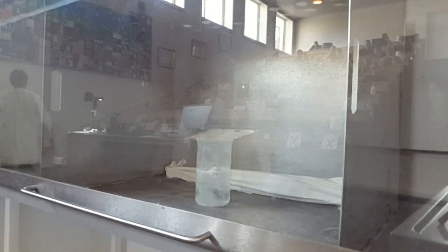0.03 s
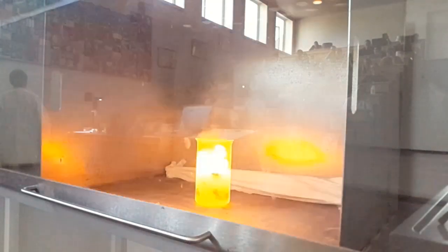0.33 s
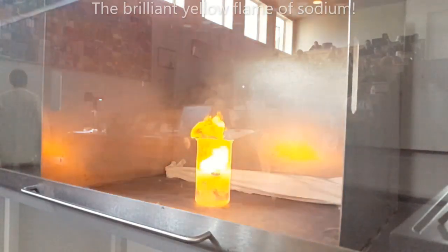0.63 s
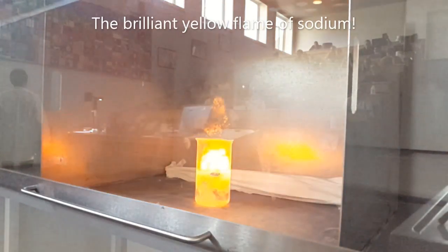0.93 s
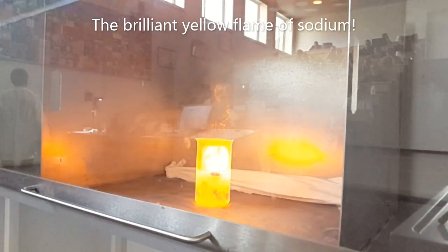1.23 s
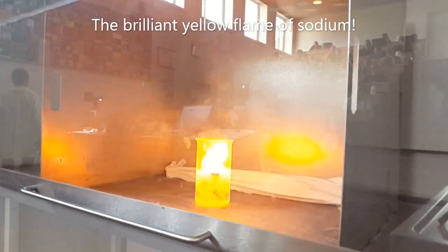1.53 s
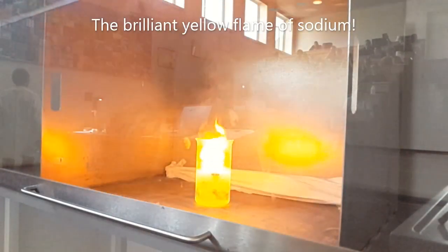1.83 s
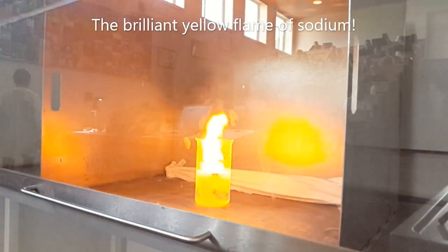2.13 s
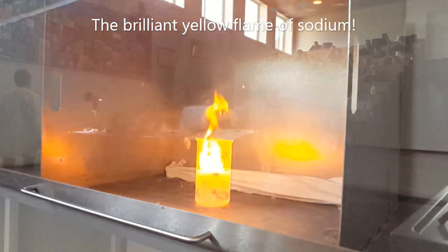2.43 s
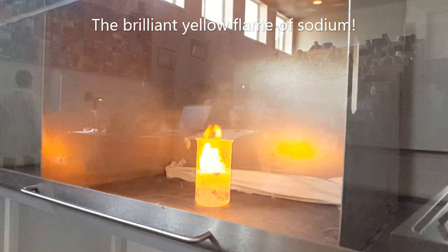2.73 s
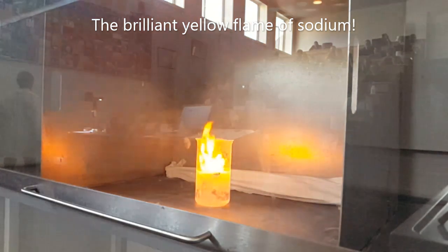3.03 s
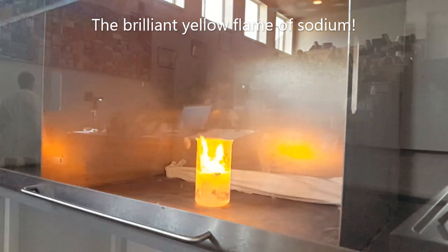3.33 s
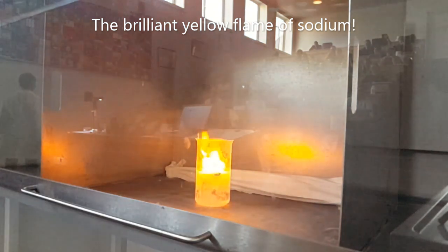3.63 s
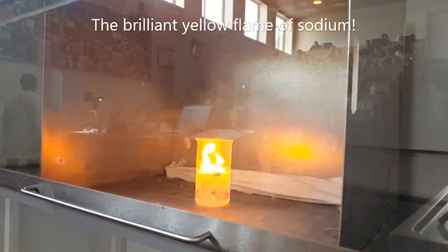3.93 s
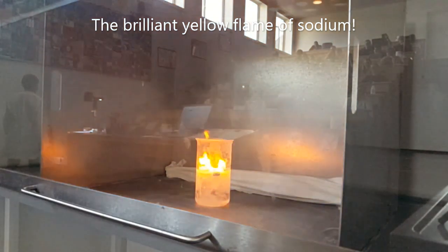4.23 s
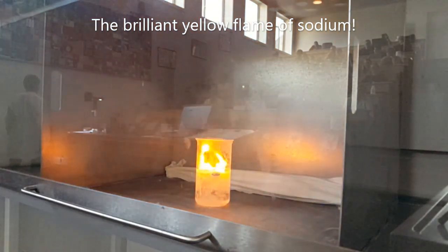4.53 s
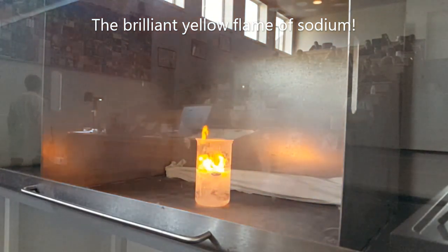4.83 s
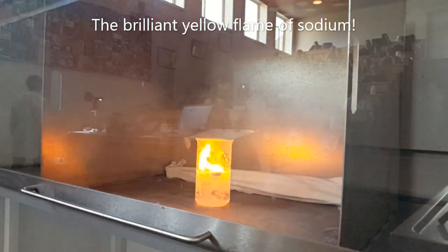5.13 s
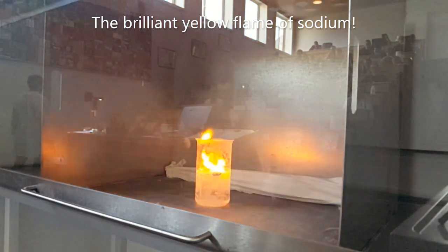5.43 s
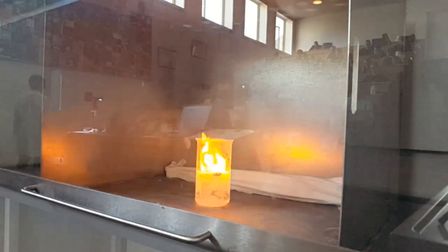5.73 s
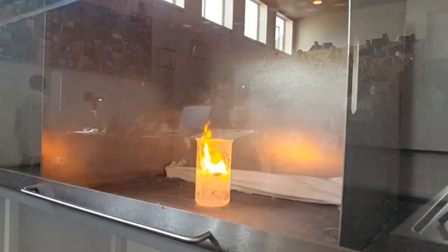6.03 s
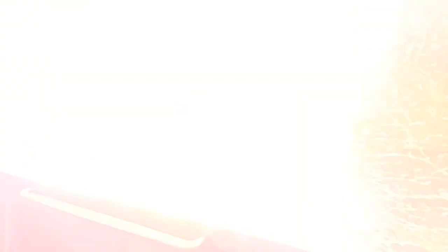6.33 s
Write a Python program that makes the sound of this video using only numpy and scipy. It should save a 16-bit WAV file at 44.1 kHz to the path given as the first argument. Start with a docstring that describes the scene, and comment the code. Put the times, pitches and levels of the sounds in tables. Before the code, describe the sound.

Over the faint rush of ventilation, a flame lights in a beaker with a soft whoomp. Its low, hollow rumble fades over a few seconds until only a slight flutter and fizz remain. Then the beaker explodes with an extremely loud, slightly distorted bang, and fragments crack left and right against the walls of the fume hood as the boom reverberates through the laboratory.

```python
"""Sodium burns on water in a beaker, then explodes, inside a humming fume hood with a faint whine.
Hydrogen fizzes off the metal and lights with a soft whoomp; the flame rumbles in the hood's cavity
and blows a faint note on the beaker's air column, which sharpens with the heat. The blast fills hood
and lab with a roar that drives a limiter, while molten droplets pop and shards crack on the walls."""
import sys
import numpy as np
from scipy.fft import rfft, irfft, next_fast_len
from scipy.io import wavfile
from scipy.ndimage import uniform_filter1d, minimum_filter1d, map_coordinates

SR = 44100
rng = np.random.default_rng(int(sys.argv[2]) if len(sys.argv) > 2 else 0)


def unload_audio(sound):
    """Save the sound as a 16-bit wav file, at the path given as the first command line argument."""
    columns = np.transpose(np.atleast_2d(sound))
    # keep every value between -1 and 1, then stretch to whole-number steps
    steps = np.round(np.clip(columns, -1, 1) * 32767)
    wavfile.write(sys.argv[1], SR, steps.astype(np.int16))


N = 289737
T = np.arange(N) / SR

LIGHT_S, CATCH_S = 0.432, 0.025  # the hydrogen lights; time the flame takes to catch
BANG_S, BURST_FADE_DB_PER_S = 6.3222, 477  # the shock arrives; how fast a burst dies
# spectrum of the blast's bright roar and of the spit before it: (frequency [Hz], level [dB])
ROAR_SPECTRUM = [(150, -22), (450, -2.5), (620, 1), (790, -4), (1050, -1.5), (1450, -8), (2000, -11.5),
                 (2500, -18.5), (2750, -52), (4000, -44), (6000, -100)]


def amp(db):
    """Amplitude ratio of a level in decibels."""
    return 10 ** (np.asarray(db) / 20)


def unit(x):
    """The signal normalised to rms 1."""
    return x / np.sqrt(np.mean(x ** 2) + 1e-20)


def along(points, hz):
    """Interpolation of (frequency [Hz], value) points on a logarithmic frequency axis."""
    freqs, values = np.transpose(points)
    return np.interp(np.log(hz + 1), np.log(freqs + 1), values)


def since(s):
    """Seconds elapsed after time s, 0 before it."""
    return np.maximum(T - s, 0)


def ramp(s, length):
    """Linear attack from 0 at time s to 1 over length seconds."""
    return np.minimum(since(s) / length, 1)


def fading(s, db_per_s):
    """Gain 1 until time s, then exponential decay (growth for a negative rate)."""
    return amp(-db_per_s * since(s))


def wobble(rate):
    """Smooth random modulation with rate knots a second."""
    return map_coordinates(rng.standard_normal(int(N * rate / SR) + 4), [T * rate])


def filtered(x, response):
    """Linear filtering: the spectrum of x times a frequency response."""
    size = next_fast_len(N + SR // 2)
    return irfft(rfft(x, size) * response(np.fft.rfftfreq(size, 1 / SR)), size)[..., :N]


def colour(points):
    """Frequency response through (frequency [Hz], level [dB]) points."""
    return lambda hz: amp(along(points, hz))


def resonances(modes):
    """Modal superposition: a sum of squared band-pass magnitudes, which have steep skirts."""
    return lambda f: sum(amp(db) * np.abs(f * width / (hz * hz - f * f + 1j * f * width)) ** 2
                         for hz, width, db in modes)


def rush(response):
    """Stereo noise of rms 1 in a diffuse field: coherent in part in the bass, unrelated in the treble."""
    # likeness of left and right: (frequency [Hz], correlation [ratio])
    coherence = [(60, 0.56), (130, 0.43), (290, 0.0027), (640, 0)]

    def mid_side_response(hz):
        angle = np.arccos(np.clip(along(coherence, hz), -1, 1)) / 2
        return response(hz) * np.array([np.cos(angle), np.sin(angle)])

    mid, side = filtered(rng.standard_normal((2, N)), mid_side_response)
    return unit(np.array([mid + side, mid - side]))


def steadied(x):
    """Noise divided by its running rms: it flutters but does not swell, as the gas supply is even."""
    power = uniform_filter1d(np.mean(x ** 2, axis=0), size=SR // 8)
    return x / np.sqrt(np.abs(power))


def ventilation():
    """Flow noise: air drawn through the hood rushes and excites the modes of the duct."""
    # spectrum of the airflow: (frequency [Hz], level [dB])
    air_spectrum = [(10, -4), (22, 2.5), (32, -4.5), (50, -6.5), (90, -11.5), (150, -3), (190, -10),
                    (285, -8.5), (350, -15), (620, -15), (1100, -17), (1600, -21.5), (2480, -38.5),
                    (2600, -57)]
    # duct resonances: (frequency [Hz], bandwidth [Hz], level [dB])
    duct_modes = [(116.8, 24, 1.5), (1042, 140, -17.5), (1183, 44, -15)]
    air = amp(-65 + 1.2 * wobble(6)) * rush(colour(air_spectrum))
    drone = amp(-68) * rush(resonances(duct_modes))
    return air + drone


def whine(pitch_hz=2498, waver_hz=0.7):
    """A faint, thin pure tone with slight random frequency modulation."""
    hz = pitch_hz + waver_hz * np.array([wobble(8), wobble(8)])
    return amp(-97.5) * unit(np.sin(2 * np.pi * np.cumsum(hz, axis=1) / SR))


def gas(strength):
    """Gas fizzes off the metal and whooshes with the flame; as incoherent noises, the two add in power."""
    # spectrum of the escaping gas: (frequency [Hz], level [dB])
    gas_spectrum = [(150, -24), (370, 3.5), (480, -0.5), (620, 0.5), (850, -5), (1050, 3.5), (1250, -6.5),
                    (1700, -10), (2400, -25.5), (2700, -69)]
    first_fizz = amp(-65.5) * fading(0.8, db_per_s=33)  # fades as the flame takes over
    overheating_fizz = amp(-75.5) * ramp(2.05, length=2.2)
    whoosh = amp(-28.5) * strength
    return np.hypot(first_fizz + overheating_fizz, whoosh) * rush(colour(gas_spectrum))


def flame_strength(settled_db=-73):
    """Envelope of the flame: flares swell and decay, adding in power to the settled flame."""
    # flares: (start [s], peak level [dB], rise time [s], decay rate [dB/s])
    flares = [(0.441, -39, 0.14, 38), (.8, -51, 0.19, 20.5), (1.285, -51, 0.017, 88),
              (1.55, -51.5, 0.022, 171), (1.95, -64.5, 0.27, 22)]
    power = sum((amp(db) * ramp(s, rise) * fading(s + rise, fade)) ** 2 for s, db, rise, fade in flares)
    return np.sqrt(power + amp(settled_db) ** 2)


def flame(strength):
    """Combustion noise: burning hydrogen excites the hood's cavity modes and settles to a flutter."""
    # cavity resonances of the hood: (frequency [Hz], bandwidth [Hz], level [dB])
    hood_modes = [(61.6, 6.9, -2.5), (90.8, 12, 1.5), (119.2, 9.7, -18), (138, 12.4, -5), (154.8, 2.5, -14),
                  (204.6, 8.3, -21.5)]
    # spectrum of the flame's rumble: (frequency [Hz], level [dB])
    rumble_spectrum = [(10, -4), (22, -4), (33, -3.5), (50, -3), (150, -6.5), (220, -20), (400, -24),
                       (900, -60), (2000, -94)]
    # bands of the small flame low in the beaker: (frequency [Hz], bandwidth [Hz], level [dB])
    flutter_bands = [(69, 18, -4), (142.5, 13, 1.5), (164, 14, -6)]
    burn = strength * steadied(rush(resonances(hood_modes)) + amp(-5) * rush(colour(rumble_spectrum)))
    flutter = amp(-66) * steadied(rush(resonances(flutter_bands)))
    return ramp(LIGHT_S, CATCH_S) * (burn + flutter)


def beaker(strength, cool_hz=414, half_width_hz=20, loss_db_per_hz=0.15):
    """Air-column resonance: turbulence blows a breathy note, which heat sharpens and weakens."""
    # swells of heat: (peak time [s], pitch rise [Hz], warming time [s], cooling time constant [s])
    heat_swells = [(1.55, 89.96, 1.1, 1.25), (4.7, 20.97, .4, .35)]
    # modes of the air column: (frequency [multiple of the pitch], level [dB])
    partials = [(1, 1), (1.58, -10.5), (2.19, -13)]
    rise_hz = sum(hz * ramp(s - warm, warm) * np.exp(-since(s) / cool) for s, hz, warm, cool in heat_swells)
    steady_drive = amp(-71.5 - loss_db_per_hz * rise_hz)
    blowing = ramp(LIGHT_S, CATCH_S) * np.hypot(steady_drive, amp(-32) * strength)
    phase = 2 * np.pi * np.cumsum(cool_hz + rise_hz) / SR
    slow_noise = lambda: rush(lambda f: 1 / (1 + (f / half_width_hz) ** 4))
    note = 0
    for ratio, db in partials:
        narrow_band = slow_noise() * np.cos(ratio * phase) + slow_noise() * np.sin(ratio * phase)
        note += amp(db) * steadied(narrow_band)
    return blowing * note


def fireball(surge_s=6.235, surge_hz=58, spit_s=6.3):
    """Volume displacement: the swelling fireball pushes out a low surge; a spit just precedes the bang."""
    surge = amp(-44) * ramp(surge_s, 0.0051) * np.sin(2 * np.pi * surge_hz * since(surge_s))
    spit = amp(-42) * ramp(spit_s, 0.006) * rush(colour(ROAR_SPECTRUM))
    return (surge + spit) * fading(BANG_S, BURST_FADE_DB_PER_S)


def explosion(thump_hz=95, thump_t60=0.043, attack_s=0.0009):
    """Shock excitation: hood and lab thump and reverberate; the bright roar decays, the boom holds on."""
    # bursts of the blast: (peak time [s], boom level [dB], roar level [dB])
    bursts = [(6.3226, -1.5, -10), (6.423, -16, -31)]
    # spectrum of the low reverberation: (frequency [Hz], level [dB])
    boom_spectrum = [(10, -9), (28, -7), (42, 4), (100, -1.5), (250, -0.5), (480, -7), (800, -20.5),
                     (2000, -53), (4000, -100)]
    # resonances of the hood's panels and the lab: (frequency [Hz], bandwidth [Hz], level [dB])
    room_modes = [(74, 61, -8), (115, 24, 3), (151, 36, 6.5), (187, 67, -2), (259, 44, 7.5), (360, 35, 2.5),
                  (424, 30, -3), (526, 47, -7), (660, 97, -9.5), (1164, 96, -11.5)]
    thump = amp(-6) * fading(BANG_S, 60 / thump_t60) * np.sin(2 * np.pi * thump_hz * since(BANG_S))
    boom_gain = amp(-19) * fading(BANG_S, db_per_s=-1.5)  # swells very slightly
    roar_gain = amp(-20.5) * fading(BANG_S, db_per_s=25)
    for s, boom_db, roar_db in bursts:
        burst = ramp(s - attack_s, attack_s) * fading(s, BURST_FADE_DB_PER_S)
        boom_gain = np.hypot(boom_gain, amp(boom_db) * burst)
        roar_gain = np.hypot(roar_gain, amp(roar_db) * burst)
    boom = amp(-1) * rush(colour(boom_spectrum)) + amp(-1.5) * rush(resonances(room_modes))
    roar = rush(colour(ROAR_SPECTRUM))
    return thump + ramp(BANG_S - attack_s, attack_s) * (boom_gain * boom + roar_gain * roar)


def spray(pops_per_s=950, length_s=0.215, spread_db=4):
    """Shot noise: the shock front snaps, then molten droplets pop at random, ever sparser."""
    # spectrum of one pop: (frequency [Hz], level [dB])
    pop_spectrum = [(300, -17), (1500, 6), (2700, 7), (4000, 0), (5500, -7), (8000, -20), (12000, -29),
                    (16000, -41)]
    rate = pops_per_s * (T > BANG_S) * (1 - ramp(BANG_S, length_s))
    size = np.hypot(amp(-15), amp(-0.5) * fading(BANG_S, BURST_FADE_DB_PER_S))  # louder in the shock
    fires = rng.random((2, N)) < rate / (2 * SR)
    polarity = np.sign(rng.standard_normal((2, N)))
    pops = fires * polarity * size * amp(spread_db * rng.standard_normal((2, N)))
    pops[:, round(BANG_S * SR)] += amp(-10)  # the shock front
    return filtered(pops, colour(pop_spectrum))


def shards(crack_t60=0.0045, scatter_db=-25, scatter_t60=0.018):
    """Impact noise: each fragment cracks against the hood, followed by a short scatter of reflections."""
    # impacts: (time [s], level [dB], left minus right [dB])
    impacts = [(6.3557, -13.5, -28), (6.398, -26, 15), (6.4094, -16, 39), (6.4369, -12, 25),
               (6.489, -13, -27), (6.517, -31, -4)]
    # spectrum of a crack: (frequency [Hz], level [dB])
    crack_spectrum = [(700, -29), (2000, 13.5), (3000, 12.5), (4200, -4), (7000, -1.5), (10000, -4),
                      (14000, -10), (16500, -21)]
    cracks = np.zeros((2, N))
    for s, db, pan_db in impacts:
        strike = (T >= s) * (fading(s, 60 / crack_t60) + amp(scatter_db) * fading(s, 60 / scatter_t60))
        pan = unit(amp([[pan_db / 2], [-pan_db / 2]]))
        cracks += amp(db) * pan * strike * rng.standard_normal((2, N))
    return filtered(cracks, colour(crack_spectrum))


def scene():
    """Superposition of all sources; one flame envelope drives the rumble, the whoosh and the note."""
    strength = flame_strength()
    burning = flame(strength) + gas(strength) + beaker(strength)
    return ventilation() + whine() + burning + fireball() + explosion() + spray() + shards()


def record(dry, threshold=0.21, ceiling=0.28, cutoff_hz=15800):
    """Peak limiting, clipping and a low-pass, over faint hiss; the level dips briefly before the bang."""
    dip_db = -25 * np.exp(-((T - 6.048) / 0.018) ** 2)
    hiss = amp(-98) * rng.standard_normal((2, N))
    x = dry * amp(dip_db) + hiss
    sensed = np.abs(uniform_filter1d(x, size=9))  # the detector is deaf to the top treble
    gain = minimum_filter1d(threshold / np.maximum(sensed, threshold), size=44)
    for samples in (32, 23, 15):  # smooth the attack and release
        gain = uniform_filter1d(gain, size=samples)
    clipped = np.clip(x * gain, -ceiling, ceiling)
    return filtered(clipped, lambda hz: 1 / np.sqrt(1 + (hz / cutoff_hz) ** 90))


dry = scene()
out = record(dry)
unload_audio(out)
```